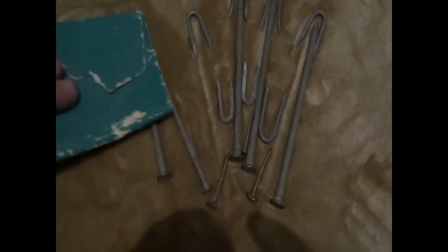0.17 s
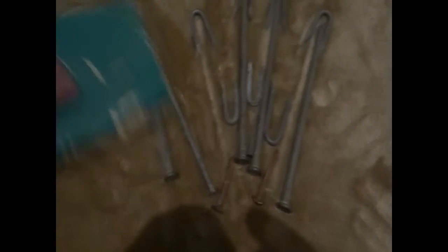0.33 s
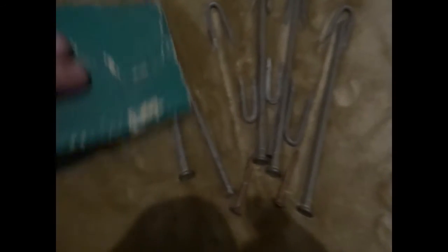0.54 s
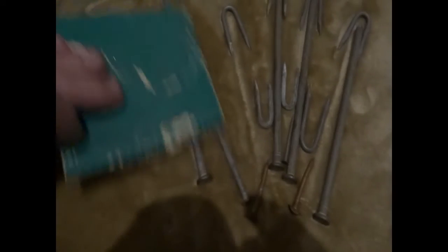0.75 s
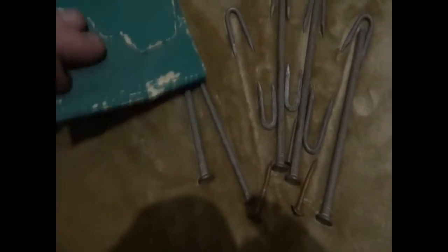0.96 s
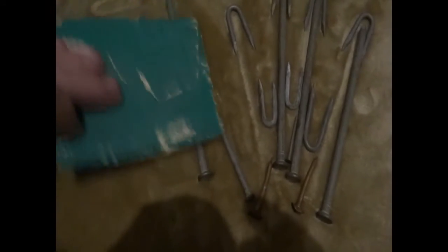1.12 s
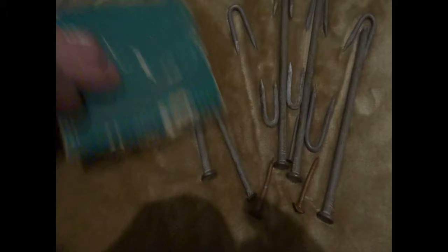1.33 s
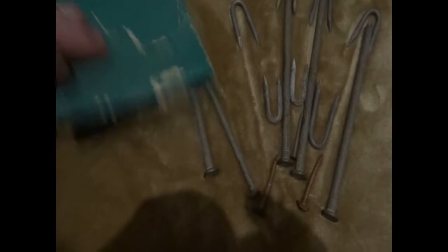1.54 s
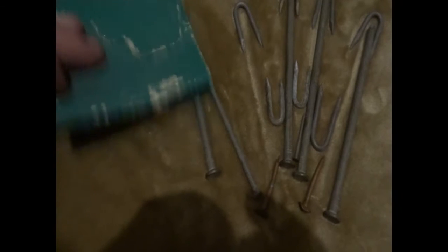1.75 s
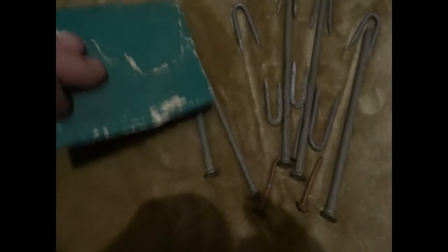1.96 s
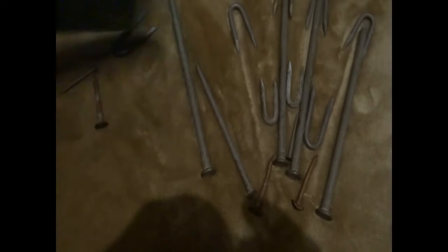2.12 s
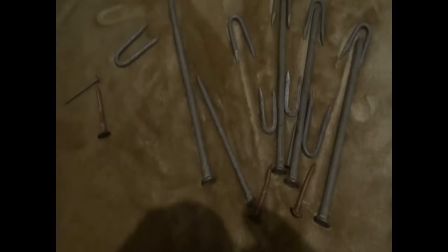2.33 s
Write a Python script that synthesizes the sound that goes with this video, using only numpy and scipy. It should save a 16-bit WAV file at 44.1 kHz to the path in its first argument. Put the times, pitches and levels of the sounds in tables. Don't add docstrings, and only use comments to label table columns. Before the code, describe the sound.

A coarse sanding pad scrapes quickly to and fro over loose steel nails and staples, strokes growing faster and brighter, then stopping with a small metallic tick; close, nearly mono, dry, faint low room rumble beneath.

```python
import sys
import numpy as np
from scipy import signal
from scipy.io import wavfile

SR = 44100
rng = np.random.default_rng(int(sys.argv[2]) if len(sys.argv) > 2 else 0)


def transcribe(signal):
    frames = np.atleast_2d(signal).T
    limited = np.clip(frames, -1, 1)
    pcm = np.round(limited * 32767).astype(np.int16)
    wavfile.write(sys.argv[1], SR, pcm)


def to_linear_factor(level_db):
    exponent = np.asarray(level_db, float) / 20
    return 10 ** exponent


N = 105443
T = np.arange(N) / SR

# start_s, length_s, level_db, board_share_db, lean (under 1 peaks late, over 1 early)
STROKES = [(0.015, 0.12, -18, -7.5, 1.02), (0.255, 0.08, -22, -2, 1.17), (0.347, 0.13, -20, -3.5, 1.21),
           (0.508, 0.13, -22.5, -4, 1.16), (0.696, 0.14, -19, -4, 1.22), (0.863, 0.12, -17, -6.5, 1.01),
           (1.009, 0.13, -15.5, -8.5, 1.21), (1.169, 0.14, -20.5, -7.5, 1.24),
           (1.327, 0.097, -16, -8.5, 0.99), (1.455, 0.096, -18.5, -5, 1.055),
           (1.568, 0.083, -14.5, -6.5, 0.95), (1.682, 0.081, -17.5, -7, 0.99),
           (1.778, 0.091, -16, -7, 1.02), (1.891, 0.069, -19, -7.5, 1.03), (1.984, 0.044, -33.5, 0, 1.27)]
# start_s, length_s, level_db, board_share_db, lean
BRUSHES = [
    (0.122, 0.041, -38.5, 3, 0.73),
    (0.173, 0.069, -41, 1, 2.26),
    (0.644, 0.0075, -43, -1, 2),
    (0.665, 0.011, -43, 1.5, 1.3),
    (0.686, 0.026, -50, 10, 0.91),
    (2.058, 0.031, -35, -7, 0.9),
    (2.103, 0.027, -32.5, -5.5, 0.68),
]
# time_s, surge_db, width_s
SNAGS = [(0.041, -1.5, 0.013), (0.071, -8, 0.015), (.089, 2.5, 0.019), (0.128, 4.5, 0.0028),
         (0.195, 7.5, 0.0057), (0.298, 5, 0.0042), (.27, -1.5, .004), (.363, 1, 0.0028), (0.386, 4, 0.011),
         (.523, 1.5, 0.0053), (0.883, 1.5, 0.0024), (0.581, -3.5, 0.0029), (.6, 2.5, 0.029),
         (0.748, -4, 0.027), (.805, 3, 0.02), (0.943, -2.5, .005), (1.012, -5, 0.0055),
         (1.027, 1.5, 0.0028), (1.034, -11, .0015), (1.041, -8, 0.0017), (1.056, -1, 0.0074),
         (1.085, 2, 0.0047), (1.11, 0.5, .012), (1.172, -2, .004), (1.181, 4, 0.004), (1.196, 8, 0.02),
         (1.225, -3, 0.005), (1.278, 0, 0.0018), (1.337, 2, .004), (1.345, -2, 0.0027), (1.353, 2, 0.0058),
         (1.385, 0.5, .008), (1.462, -2.5, .005), (1.475, 4, 0.0033), (1.484, 3, 0.023),
         (1.514, -12, 0.0036), (1.588, 4, 0.0025), (1.595, -9, 0.0026), (1.705, 3, 0.0036),
         (1.727, -7.5, 0.003), (1.573, -8, 0.0059), (1.693, 6.5, 0.0054), (1.787, -5, 0.0087),
         (1.799, 1.5, .004), (1.82, 0.5, 0.016), (1.837, 3.5, 0.0024), (1.845, -3.5, 0.0062),
         (1.894, -7, 0.0048), (1.901, 1, 0.0028), (1.917, 3, 0.0047), (1.948, -2, .006)]
# time_s, place (about -1 to 1)
PLACE = [(0, -0.79), (.2, -1.02), (.4, -0.39), (.6, -0.29), (.8, -0.76), (.95, 0.43), (1.1, 0.28),
         (1.3, 0.86), (1.6, 0.47), (1.95, 1)]
# pitch_hz, level_db (per Hz)
GRIT_COLOUR = [(1760, -18), (3000, -9.5), (3780, 0.5), (4410, -10.5), (5070, 9.5), (8400, 5), (10900, -3.5),
               (14700, -35), (16000, -48)]
# pitch_hz, level_db (per Hz)
BOARD_COLOUR = [(150, -61), (250, -70), (496, -11.5), (807, -18.5), (1010, -3), (1170, -7.5), (1440, 0.5),
                (3170, -2.5), (4000, -9), (5200, -3), (8800, -120)]
# pitch_hz, width_hz, level_db, gain_across_pile_db
NAIL_RINGS = [(4416, 100, 3.5, 7), (5810, 70, -4.5, -8), (6180, 310, 10.5, -8.5), (6584, 39, 9.5, -6),
              (6990, 190, 5, -6.5), (8000, 130, -13, 11), (8900, 67, -41, -13)]
# pitch_hz, width_hz, level_db, gain_across_pile_db
PANEL_RINGS = [(680, 81, -8.5, -3.5), (1064, 36, -2, -8), (1475, 39, -4, -0.5), (1874, 97, -1, 5),
               (2280, 150, 0, 4.5), (2880, 56, -11, -6)]
# time_s, width_s, pitch_hz, level_db
SQUEALS = [(.1, 0.0084, 1630, -35), (.735, 0.019, 3080, -33.5), (.425, 0.019, 2360, -24.5),
           (.39, 0.011, 5430, -26), (.56, 0.016, 1457, -31), (.78, 0.029, 1790, -33),
           (.805, .008, 3660, -33), (.895, 0.012, 1056, -34.5), (0.899, 0.0074, 1715, -32),
           (.92, 0.017, 2800, -29.5), (0.951, 0.0047, 4330, -24), (1.027, 0.0028, 4400, -24),
           (1.048, .004, 4430, -30), (1.045, 0.009, 1920, -28.5), (1.06, 0.0072, 6200, -19),
           (1.078, 0.0088, 2010, -26.5), (1.085, .006, 4860, -27), (1.102, 0.016, 1450, -29.5),
           (1.19, 0.011, 2660, -31.5), (1.19, 0.01, 1010, -33), (1.205, .012, 1790, -34),
           (1.21, .014, 4380, -29), (1.277, 0.0044, 4400, -31), (1.354, .005, 4650, -20.5),
           (1.38, .012, 1870, -32), (1.49, 0.014, 1485, -29), (1.588, 0.0038, 4440, -19.5),
           (1.61, 0.01, 2070, -30.5), (1.706, 0.009, 7000, -21.5), (1.739, 0.016, 4470, -29),
           (1.825, 0.0079, 5850, -30), (1.84, .006, 6550, -28), (1.918, 0.0056, 4400, -21),
           (1.925, 0.016, 1800, -33.5), (2.0, 0.014, 1830, -38.5), (2.124, 0.01, 7800, -39),
           (.59, 0.0088, 6000, -26.5), (.29, 0.014, 5000, -28.5), (1.6, 0.0048, 6400, -22)]
# time_s, level_db
DRAG_LEVEL = [(0, -68), (.008, -37.5), (.21, -46.5), (.235, -55.5), (.5, -46), (1.0, -45), (1.6, -40.5),
              (1.9, -38), (2.05, -47.5), (2.25, -46), (2.39, -49)]
# pitch_hz, level_db (per Hz)
DRAG_COLOUR = [(250, -21.5), (480, -10.5), (800, -16), (1900, -17), (3150, -15.5), (6250, -4), (10400, -16),
               (13600, -18.5), (15500, -47)]
# pitch_hz, width_hz, level_db, gain_across_pile_db
DRAG_RINGS = [(1115, 73, -4.5, -9.5), (2540, 840, 6, -1.5), (3496, 79, -10, 9), (4080, 92, -4, 2),
              (5000, 240, -9, 0), (6270, 170, 3.5, 3.5), (7300, 410, -21.5, 20)]
# time_s, body_db, crack_db, pitch_factor
TICKS = [
    (.303, -22.5, -34, 0.39),
    (.5835, -44, -26, 1.01),
    (2.1085, -22.5, -14.5, 1.07),
    (2.2548, -36, -32, 1.38),
    (2.327, -36.5, -41, 1.5),
]
# pitch_hz, level_db, fade_s (time to fall 60 dB)
TICK_MODES = [(1687, -5.5, 0.023), (2167, -7.5, 0.027), (2600, -21, 0.03)]
# pitch_hz, level_db (per Hz)
RUMBLE_COLOUR = [(15, -39), (32, -7), (86, 2), (145, 0.5), (225, -12.5), (350, -9), (460, -34), (770, -120)]
# time_s, level_db
RUMBLE_LEVEL = [(.05, -66.5), (.25, -62), (.47, -68), (.68, -65.5), (.85, -71.5), (1.1, -66), (1.19, -62),
                (1.45, -58.5), (1.65, -68.5), (1.98, -66.5), (2.18, -60.5), (2.39, -66.5)]
# pitch_hz, level_db
HUMS = [(79, 0), (106, -6)]
# pitch_hz, left_over_right_db
TILT = [(100, 0.5), (350, 1), (1400, 0.3), (2800, 1.8), (6000, 0.4), (12000, 0.3)]
# pitch_hz, side_under_mid_db
WIDTH = [(60, -26), (250, -9.5), (700, -14), (1400, -33), (2800, -14.5), (4600, -22), (6500, -29),
         (9200, -18.5), (11500, -40), (15000, -45)]


def motion():
    overrun_s, flatness = 0.013, 1.037
    grit_power, board_power = 3.09, 1.81
    speed, grit, board = np.zeros((3, N))
    for start, length, db, board_db, lean in STROKES + BRUSHES:
        over = min(overrun_s, 0.33 * length)
        progress = np.clip((T - start + over) / (length + 2 * over), 0, 1)
        arc = np.abs(np.sin(np.pi * progress ** (1 / max(lean, 0.3))))
        stroke_speed = np.tanh(flatness * arc) / np.tanh(flatness)
        speed = np.maximum(speed, stroke_speed)
        grit += to_linear_factor(db) * stroke_speed ** grit_power
        board += to_linear_factor(db + board_db) * stroke_speed ** board_power
    snag_db = 0
    for time, db, width in SNAGS:
        side_width = np.where((T - time) * db < 0, 0.5 * width, width)
        snag_db = snag_db + db * np.exp(-0.5 * ((T - time) / side_width) ** 2)
    snag = to_linear_factor(snag_db)
    return speed, grit * snag, board * snag


def grains(speed):
    grains_per_s, slowest_share, spread_db = 7000, 0.3, 3
    chance = grains_per_s * (slowest_share + speed) / SR
    size_db = spread_db * np.minimum(rng.exponential(1, (2, N)), 3.5)
    sizes = to_linear_factor(size_db) * rng.choice([-1, 1], (2, N))
    caught = rng.random((2, N)) < chance
    return sizes * caught / np.sqrt(chance) + 1e-18


def scratch():
    speed, grit_gain, board_gain = motion()
    catches = grains(speed)
    judder = to_linear_factor(1.24 * drift(240) + 1.07 * drift(27.6))
    top_db = 22.5 * place_on_pile() - 1 * (speed - 1)
    grit = coloured(catches, GRIT_COLOUR, 3.15, 36, top_db)
    grit = grit + to_linear_factor(-5) * resonant(catches, NAIL_RINGS, 1.34)
    board = coloured(catches, BOARD_COLOUR, 2.2, 15.3)
    board = board + to_linear_factor(-6.5) * resonant(catches, PANEL_RINGS, 5.1)
    grit = to_linear_factor(-4.5) * grit_gain * cut(grit, 14550, "low")
    board = to_linear_factor(-3.5) * board_gain * cut(board, 378, "high")
    return judder * (grit + board)


def squeal():
    cycles = 20
    out = np.zeros((2, N))
    t = np.arange(-4096, 4096) / SR
    for time, width, hz, db in SQUEALS:
        ring = ring_at(rng.standard_normal(len(t)), hz, hz / cycles)
        swell = np.exp(-0.5 * (t / np.where(t < 0, 0.96 * width, width)) ** 2)
        start = max(int(time * SR) - len(t) // 2, 0)
        out[:, start:start + len(t)] += pair(to_linear_factor(db) * swell * rms_one(ring), hz)
    return out


def ticks():
    crack_s = 0.00033
    out = 0
    noise = signal.lfilter([0.6], [1, -0.4], rng.standard_normal(N))
    for time, body_db, crack_db, pitch in TICKS:
        age = np.maximum(T - time, 0)
        tap = to_linear_factor(crack_db) * noise * np.exp(-age / crack_s) * (T >= time)
        for hz, mode_db, fade_s in TICK_MODES:
            fading = to_linear_factor(body_db + mode_db - 60 * age * pitch / fade_s)
            tap = tap + fading * np.sin(2 * np.pi * hz * pitch * age)
        out = out + pair(tap, 2300)
    return cut(out, [450, 13200], "band")


def drag():
    noise = rng.standard_normal((2, N))
    hiss = coloured(noise, DRAG_COLOUR, 2.6, 20)
    hiss = hiss + to_linear_factor(-4) * resonant(noise, DRAG_RINGS, 0.37)
    return to_linear_factor(np.interp(T, *np.transpose(DRAG_LEVEL))) * cut(hiss, 13800, "low")


def rumble():
    hum = 0
    for hz, db in HUMS:
        wavering_hz = hz * (1 + 0.049 * drift(4.16))
        phase = 2 * np.pi * np.cumsum(wavering_hz) / SR
        hum = hum + to_linear_factor(db + 2.0 * drift(2.0)) * np.sin(phase)
    murmur = coloured(rng.standard_normal((2, N)), RUMBLE_COLOUR, 0.88, 8)
    low = murmur + pair(hum, 90)
    return to_linear_factor(np.interp(T, *np.transpose(RUMBLE_LEVEL))) * low


def coloured(sources, spectrum, patchy_db, patch_rate, top_db=0):
    low, high = spectrum[0][0], min(spectrum[-1][0], 0.45 * SR)
    edges = np.geomspace(low, high, int(3 * np.log2(high / low)) + 2)
    out = 0
    for k, band in enumerate(zip(edges, edges[1:])):
        hz = np.sqrt(band[0] * band[1])
        one = signal.sosfilt(signal.butter(2, band, "band", fs=SR, output="sos"), sources[k % 2])
        top = top_db * max(0, np.log2(hz / 9370))
        gain = to_linear_factor(at_hz(spectrum, hz) + top + patchy_db * drift(patch_rate))
        out = out + pair(gain * one, hz)
    return rms_one(out)


def resonant(sources, peaks, patchy_db):
    out, place = 0, place_on_pile()
    for k, (hz, width_hz, db, place_db) in enumerate(peaks):
        ring = ring_at(sources[k % 2], hz, width_hz)
        gain = to_linear_factor(db + place_db * place + patchy_db * drift(26.6))
        out = out + pair(gain * rms_one(ring), hz)
    return rms_one(out)


def ring_at(source, hz, width_hz):
    r = np.exp(-np.pi * width_hz / SR)
    return signal.lfilter([1, 0, -1], [1, -2 * r * np.cos(2 * np.pi * hz / SR), r * r], source)


def place_on_pile():
    return np.interp(T, *np.transpose(PLACE))


def pair(mid, hz):
    side = to_linear_factor(at_hz(WIDTH, hz) - 2) * np.roll(mid, 150)
    tilt = to_linear_factor(at_hz(TILT, hz) * np.array([[0.5], [-0.5]]))
    return tilt * mid + side * [[1], [-1]]


def drift(rate):
    r = np.exp(-16 * np.pi * rate / SR)
    slow = signal.lfilter([1], [1, -2 * r, r * r], rng.standard_normal(N // 8 + 3002))
    slow = slow[3000:]
    return np.interp(np.arange(N) / 8, np.arange(len(slow)), rms_one(slow))


def at_hz(points, hz):
    pitches, levels = np.transpose(points)
    return np.interp(np.log(hz), np.log(np.maximum(pitches, 10)), levels)


def cut(x, hz, kind):
    return signal.sosfilt(signal.butter(4, hz, kind, fs=SR, output="sos"), x)


def rms_one(x):
    return x / np.sqrt(np.mean(x ** 2) + 1e-20)


def scene():
    return scratch() + squeal() + ticks() + drag() + rumble()


def top_cut(x):
    return signal.sosfilt(signal.butter(12, 16460, fs=SR, output="sos"), x)


def record(dry):
    mix = signal.sosfilt(signal.cheby2(12, 70, 16600, fs=SR, output="sos"), dry)
    return top_cut(mix)


dry = scene()
out = record(dry)
transcribe(out)
```